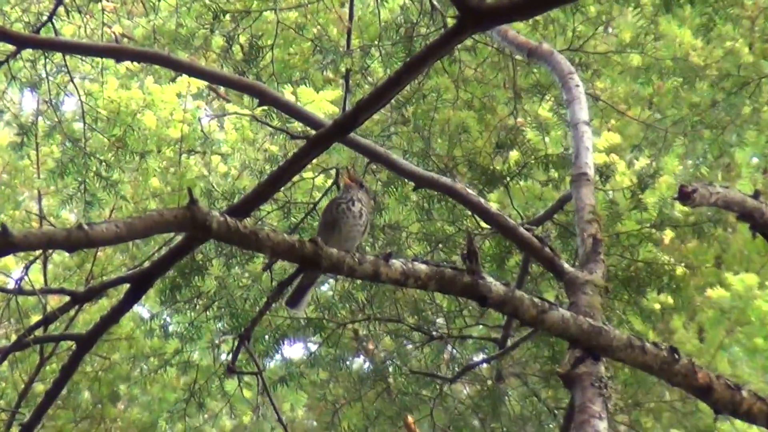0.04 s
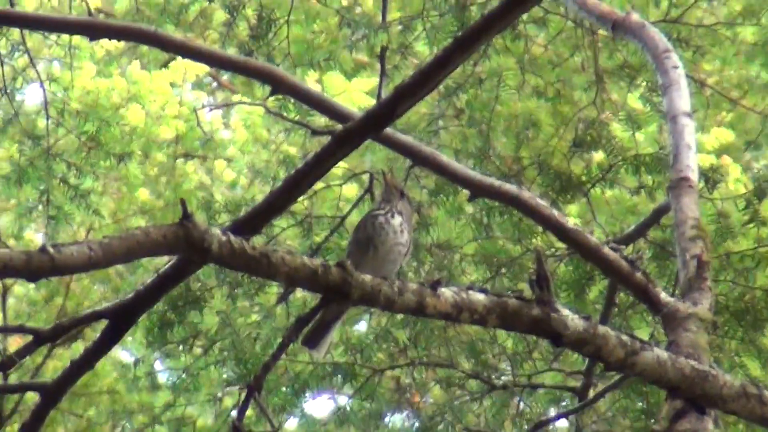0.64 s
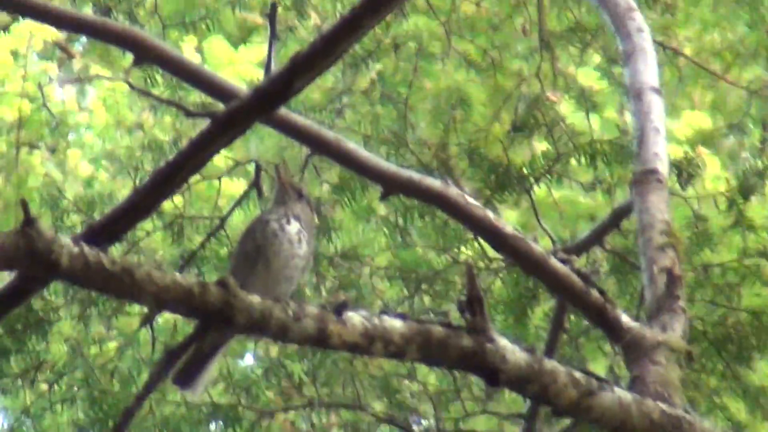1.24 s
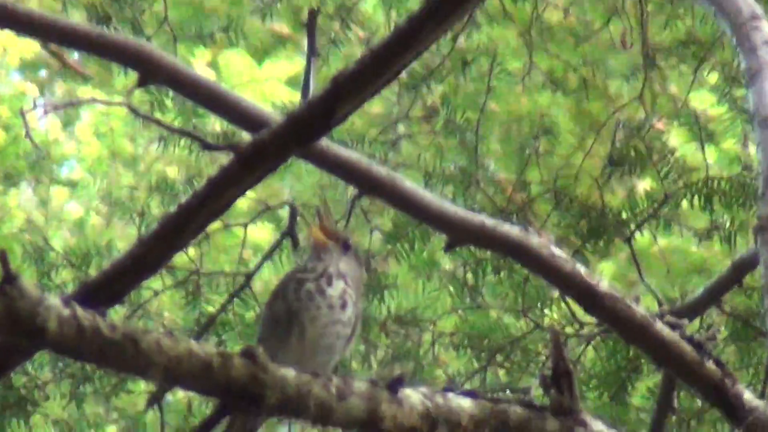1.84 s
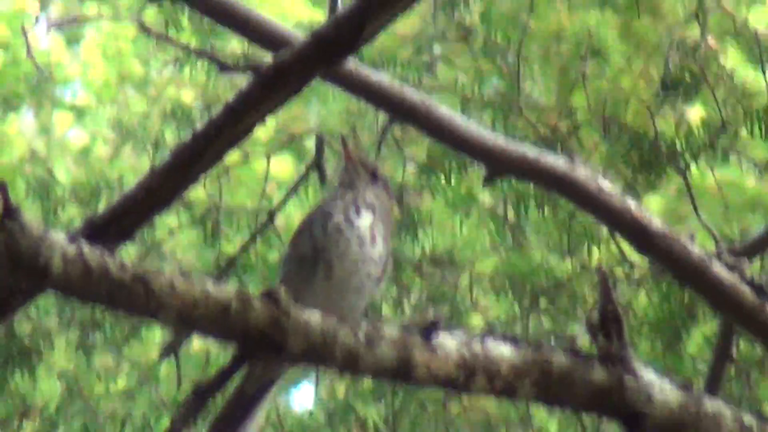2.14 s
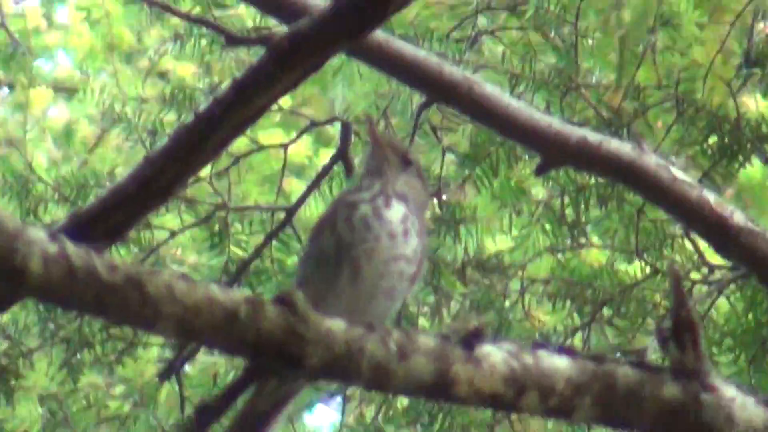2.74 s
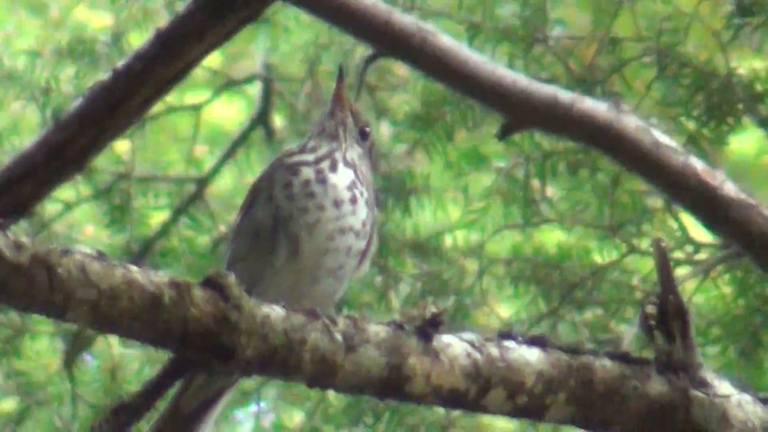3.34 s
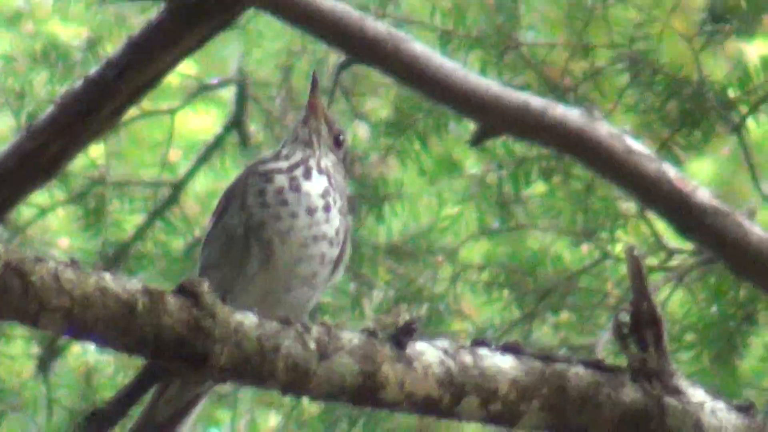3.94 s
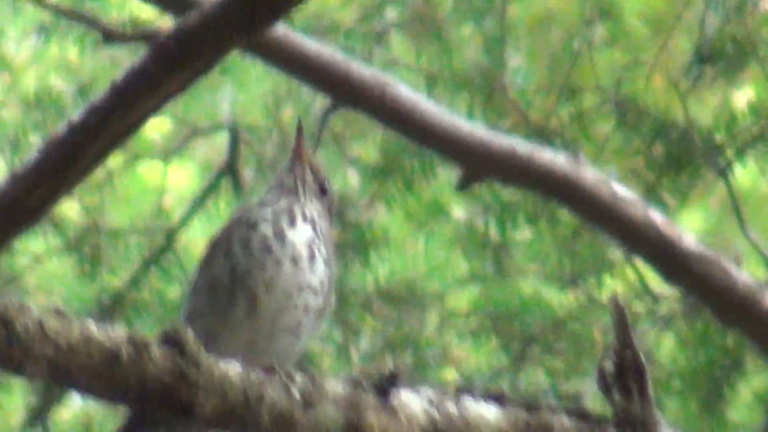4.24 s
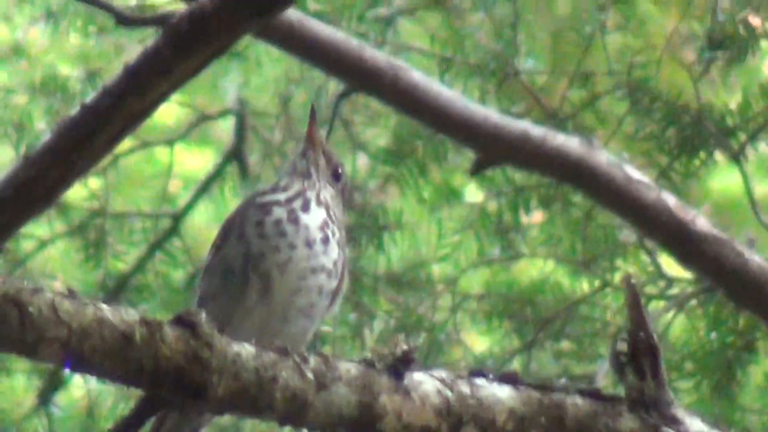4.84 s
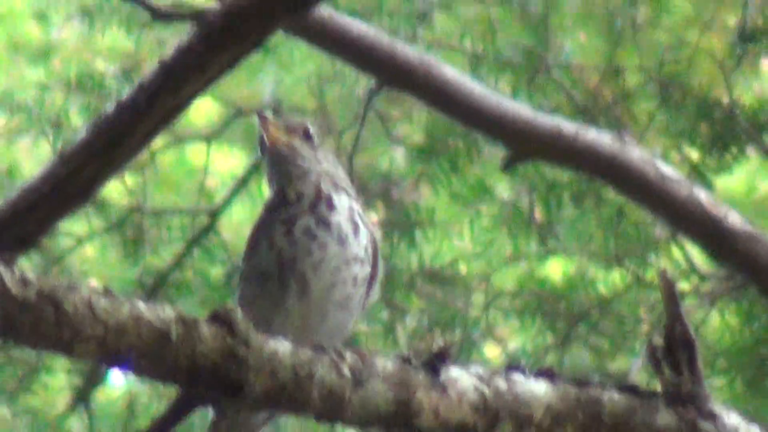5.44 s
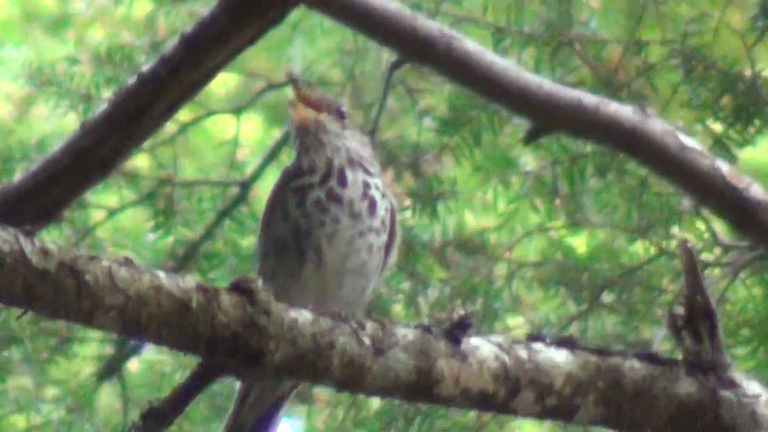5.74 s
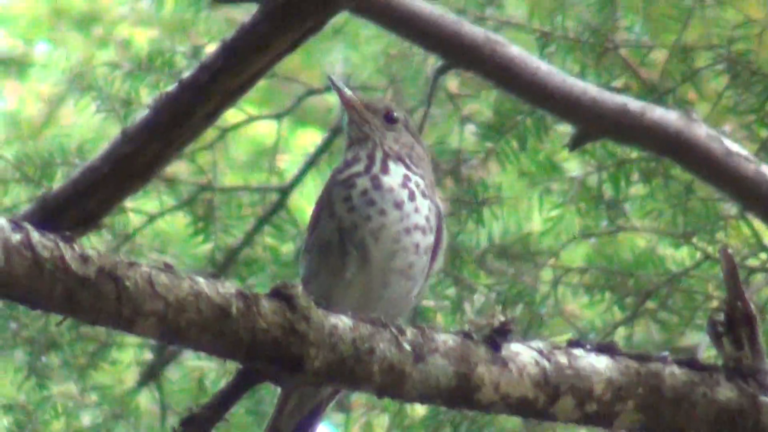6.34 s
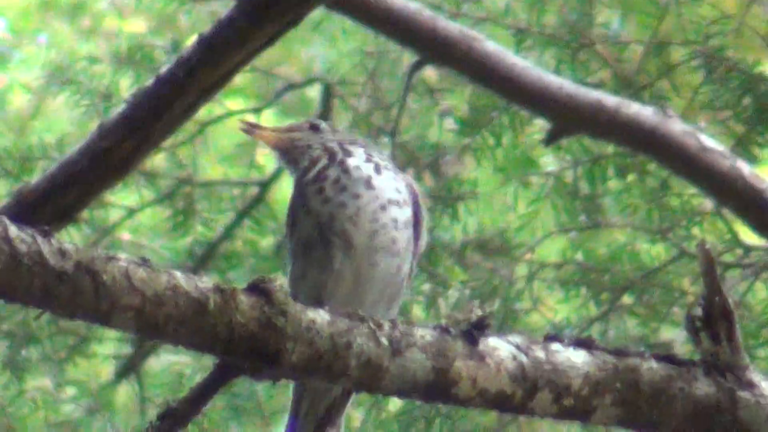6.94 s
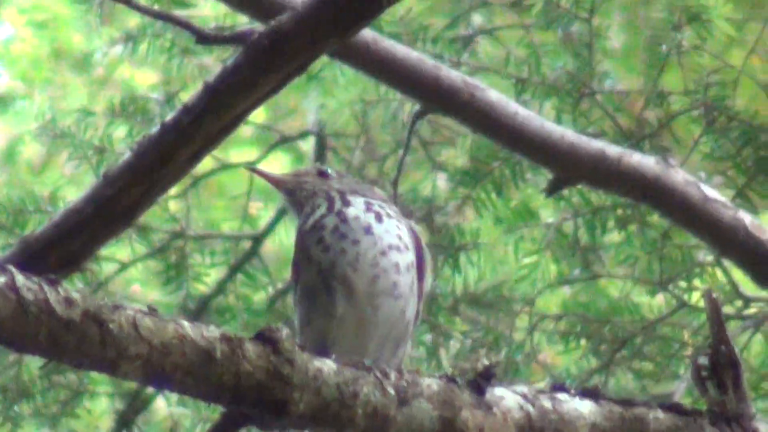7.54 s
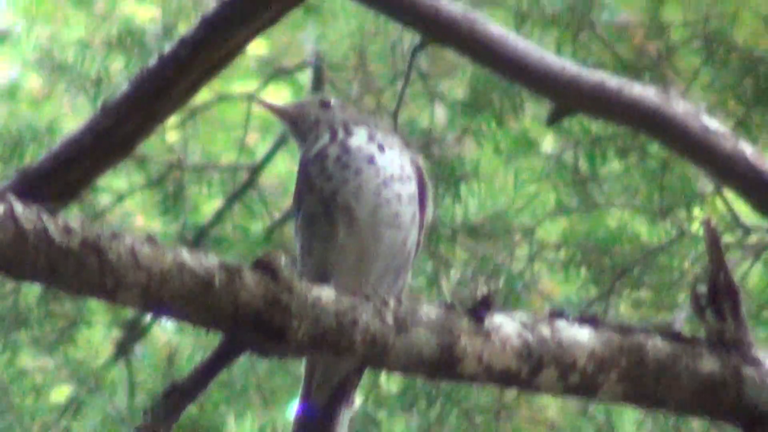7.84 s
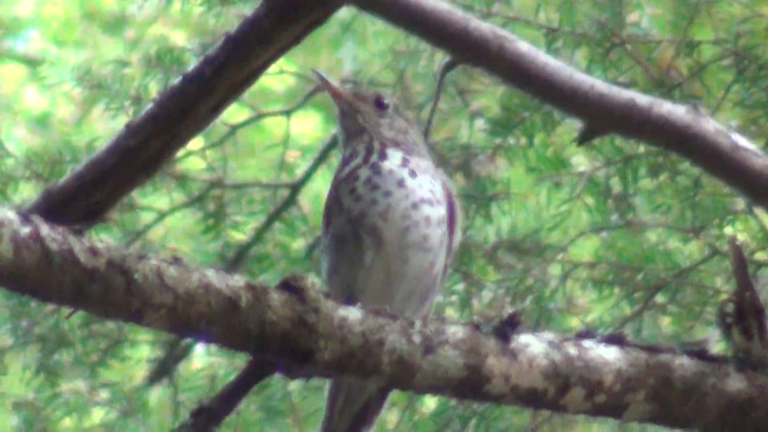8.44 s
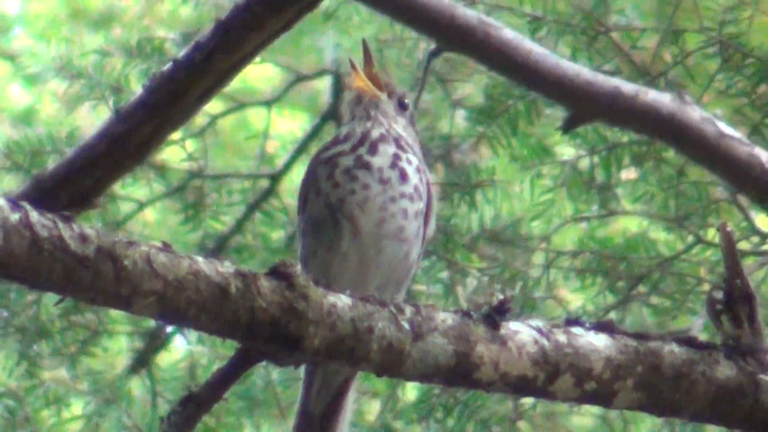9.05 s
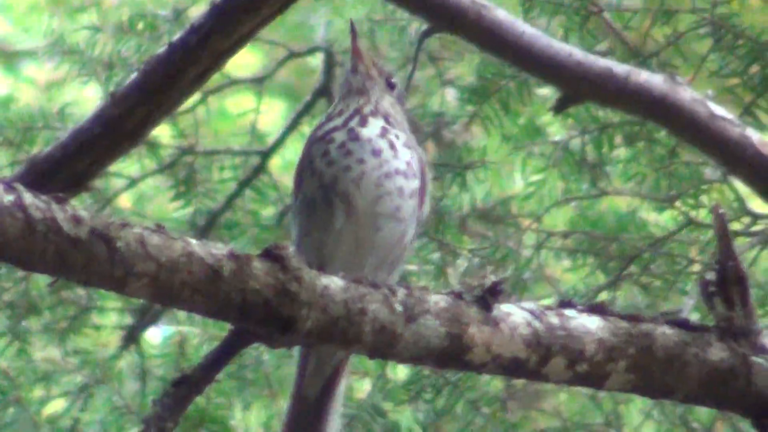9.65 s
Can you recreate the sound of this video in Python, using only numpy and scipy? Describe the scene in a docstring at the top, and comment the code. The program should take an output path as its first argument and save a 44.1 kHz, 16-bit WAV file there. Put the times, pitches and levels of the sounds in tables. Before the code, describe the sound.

A thrush gives five rising, whining calls in a quiet forest, with faint far birds, soft rustles and a distant engine rumble.

```python
"""A thrush gives five rising, whining calls in a quiet forest, over a distant engine's rumble.
Both sides of its syrinx sound at once and modulate each other; trunks and leaves scatter the sound.
Other birds whistle thinly far off. Soft rustles, faint hollow pips and one short chup come between.
An even hiss lies under it all."""
import sys
import numpy as np
from scipy import signal
from scipy.fft import rfft, irfft, next_fast_len
from scipy.io import wavfile
from scipy.ndimage import map_coordinates

SR = 44100
rng = np.random.default_rng(int(sys.argv[2]) if len(sys.argv) > 2 else 0)


def generate_wav(sig):
    """Save sig (samples, or channels by samples) to the path in sys.argv[1] as 16-bit PCM at SR."""
    pcm = np.round(np.clip(np.atleast_2d(sig).T, -1, 1) * 32767).astype(np.int16)
    wavfile.write(sys.argv[1], SR, pcm)


N = 427769
TIME_S = np.arange(N) / SR

# thrush calls: start t/s, top of climb t/s, accent t/s, end t/s, top f/Hz, glide/(Hz/s), scoop/Hz,
# accent/Hz, voice gap/Hz, gap widening/(Hz/s), sag/(dB/s), relative level/dB, upper-partial lift/dB
CALLS = [(-.13, .083, .174, .31, 2337, 200.5, 350, 100, 406.4, 150, 0, -39, -5),
         (1.559, 1.719, 1.803, 1.995, 2296, 399, 300.3, 51.8, 399.6, 598, 1, -42.6, -4.5),
         (5.479, 5.656, 5.774, 5.89, 2348, 490.5, 502, 86, 387.5, -1100, 0, -39.9, -4.5),
         (6.953, 7.181, 7.36, 7.44, 2405, 371, 150, 53.9, 263, -1100, 17, -42, 2),
         (8.751, 8.972, 9.004, 9.175, 2436, -700, 268, 56, 428, 1098.5, -1, -39.5, -2.3)]
# syrinx partials at m * low + n * high: (m, n) -> relative level/dB
SYRINX_PARTIALS = {(1, 0): 0, (0, 1): 3, (-1, 2): -15, (-2, 3): -19, (4, -2): -23.5, (3, -1): -15, (2, 0): 0, (1, 1): -8.5, (0, 2): 0, (-1, 3): -15.5, (4, -1): -24, (3, 0): -15.5, (2, 1): -20, (1, 2): -23, (0, 3): -14.5, (4, 0): -17, (3, 1): -20, (2, 2): -19, (1, 3): -27, (0, 4): -15.5, (-1, 5): -17.5, (5, 0): -21.5, (4, 1): -20, (0, 5): -11, (-1, 6): -19, (6, 0): -19, (5, 1): -23, (4, 2): -17}
# windpipe and beak response: f/Hz, gain/dB
THROAT_RESPONSE = [(1500, -16), (2150, -15.7), (2500, -14.5), (2700, -13.5), (2950, -15), (3400, -9.5),
                   (4000, -2.5), (4800, 1.5), (5600, -4), (6300, -10.5), (7200, -10), (8700, -16),
                   (10500, -10.5), (12500, -11), (14500, -12), (16000, -17)]
# air rushing through the syrinx: f/Hz, relative level/dB
RASP_SPECTRUM = [(1500, -24), (2500, -11.5), (3500, -12.5), (4900, -10), (5600, -7), (6400, -14.5),
                 (8700, -34), (10500, -22), (12500, -26), (14500, -12), (16000, -19)]
# far rumble and rush, colour: f/Hz, relative level/dB
RUMBLE_SPECTRUM = [(20, -33), (40, -9), (62, -8.5), (95, 1.5), (135, -2), (190, -2), (260, -3.5),
                   (380, -19.5)]
RUSH_SPECTRUM = [(170, -13), (320, 2), (450, 0), (650, -2), (880, 1), (1070, -6), (1210, -1), (1300, -7.5),
                 (1370, -5.5), (1550, -11.5), (1900, -16), (3000, -29.5)]
# far rumble and rush, course: t/s, relative level/dB
RUMBLE_ENVELOPE = [(0, -60.5), (.9, -65), (2.0, -63.5), (4.6, -62.5), (5.8, -63), (7.2, -61), (8.0, -65),
                   (9.1, -61.5), (9.7, -64.5)]
RUSH_ENVELOPE = [(0, -63.5), (2.0, -63), (4.6, -63.5), (7.4, -61.5), (8.5, -64.5), (9.3, -60.5)]
# low engine orders: multiple, relative level/dB
ORDERS = [(3, -77.5), (4, -71), (5, -75.5), (6, -75.5), (7, -72.5), (8, -75.5), (9, -72)]
# swells of the engine's drone: t/s, 1/e half-width/s, relative level/dB
SWELLS = [(3.0, 0.48, -66), (6.305, 0.24, -64), (7.197, 0.49, -67.5)]
# hiss, common to both ears and differing between them: f/Hz, relative level/dB
HISS_MID_SPECTRUM = [(1060, -26), (1800, -5.5), (2680, -6), (2800, -6), (3550, -7), (3850, -5),
                     (3990, -8.5), (4910, -5), (5280, -7), (7860, -7.5), (15600, -9.5)]
HISS_SIDE_SPECTRUM = [(1800, 14), (3300, -31), (5500, 7), (8000, 10), (11000, -1.5)]
# far birds: start t/s, length/s, first f/Hz, last f/Hz, middle dip/Hz, relative level/dB
FAR_WHISTLES = [(.74, .33, 3800, 3715, -1.5, -81.5), (1.21, 0.13, 2880, 2910, 0, -81),
                (3.10, .62, 4200, 3970, 229.5, -77), (3.85, .32, 4140, 4050, 0.5, -76),
                (3.66, 0.25, 3370, 3370, 40.5, -77.5), (3.85, .65, 2790, 2800, 0.5, -84),
                (4.22, 0.16, 3400, 3385, 1, -79), (4.28, .21, 3150, 3130, 0, -79),
                (9.55, .26, 3270, 3310, 0, -79), (9.52, 0.31, 4300, 4420, 0, -78)]
# soft rustles: t/s, relative level/dB
RUSTLE_PEAKS = [(2.955, -57), (3.031, -54), (3.244, -49.5), (4.753, -56), (4.822, -53), (4.97, -53),
                (9.255, -57), (9.575, -51), (9.619, -53)]
# rustle colour: f/Hz, relative level/dB
RUSTLE_SPECTRUM = [(500, 2), (900, 12), (1400, 8), (2000, -34), (3000, -22)]
# long whistle from another tree: t/s, f/Hz, relative level/dB
LONG_WHISTLE_PATH = [(3.50, 4030, -82), (3.78, 4250, -79), (3.93, 4300, -69.5), (4.19, 4243, -64.5),
                     (4.35, 4263, -66.5), (4.74, 4305, -60), (4.95, 4285, -68), (5.19, 4290, -71),
                     (5.28, 4210, -86)]
# far hollow pips: t/s, f/Hz, relative level/dB
FAR_PIPS = [(3.54, 1193, -69), (5.81, 1208, -64.5), (6.78, 1254, -72), (7.06, 914, -70), (7.26, 1234, -67),
            (7.71, 925, -65.5), (7.78, 1227, -69.5), (7.95, 898, -65.5), (8.98, 922, -68),
            (9.18, 1213, -68.5), (9.62, 912, -60)]


def from_db(db):
    """Decibels to gain."""
    return 10 ** (np.asarray(db) / 20)


def unit_rms(x):
    """Scale to rms 1."""
    return x / np.sqrt(np.mean(x ** 2) + 1e-20)


def in_time(rows, t=TIME_S):
    """Table columns, linearly interpolated in time."""
    times_s, *columns = np.transpose(rows)
    return [np.interp(t, times_s, column) for column in columns]


def db_at(spectrum, hz):
    """Spectrum level, interpolated over log frequency."""
    points_hz, level_db = np.transpose(spectrum)
    return np.interp(np.log(hz), np.log(points_hz), level_db)


def phase_of(hz):
    """Running phase of a changing pitch."""
    return 2 * np.pi * np.cumsum(hz) / SR


def span(start_s, end_s, fade_s=.0011):
    """Sample indices of a note and its soft-edged gate."""
    at = np.arange(max(int(start_s * SR), 0), min(int(end_s * SR), N))
    return at, np.clip(np.minimum(at - at[0], at[-1] - at) / (fade_s * SR), 0, 1)


def drift(rate_hz, size=N):
    """Smooth random curve, spread near 1."""
    knots = rng.standard_normal(int(2 * rate_hz * size / SR) + 4)
    coarse = np.arange(0, size + 20, 20)
    curve = map_coordinates(knots, [coarse * 2 * rate_hz / SR], order=2, mode="nearest")
    return np.interp(np.arange(size), coarse, curve)


def noise(spectrum):
    """Coloured noise, rms 1, falling steeply beyond the table's ends."""
    size = next_fast_len(N)
    hz = np.maximum(np.arange(size // 2 + 1) * SR / size, 1)
    edges = np.minimum(1, np.minimum(hz / spectrum[0][0], spectrum[-1][0] / hz)) ** 4
    white = rfft(rng.standard_normal(size))
    return unit_rms(irfft(white * from_db(db_at(spectrum, hz)) * edges, size)[:N])


def stereo(mid, side, left_db):
    """Mid and side to left and right; left_db is left over right."""
    sign = np.array([[1], [-1]])
    return (mid + sign * side) * from_db(sign * left_db / 2)


def syrinx_voices(t, start_s, top_s, accent_s, end_s, top_hz, glide_hz_per_s, scoop_hz, accent_hz,
                  gap_hz, widening_hz_per_s, sag_db_per_s):
    """Two pitches and a level contour: a call scoops up, climbs, glides with one accent and droops."""
    climb_hz_per_s, droop_hz, narrowing_hz_per_s = 2397, 168, 230
    attack_db, swell_db_per_s, release_db = 14.5, 31, 8
    age_s, to_top_s, held_s = t - start_s, np.maximum(top_s - t, 0), np.maximum(t - top_s, 0)
    ending = np.exp((t - end_s) / .036)
    wander_hz = 4.1 * drift(15.94, len(t))
    bend_hz = glide_hz_per_s * held_s + accent_hz * np.exp(-abs(t - accent_s) / .031) + wander_hz
    rise_hz = top_hz - scoop_hz * np.exp(-age_s / .027) - climb_hz_per_s * to_top_s
    low_hz = rise_hz + bend_hz - droop_hz * ending
    # high voice: splits off late, bends further, wobbles, closes in at the end
    split = 1 - np.exp(-np.maximum(age_s - .047, 0) / .024)
    closing = 1 - .8 * np.exp((t - end_s) / .028)
    spacing_hz = gap_hz - widening_hz_per_s * to_top_s - narrowing_hz_per_s * held_s
    wobble_hz = 11.04 * drift(22, len(t))
    high_hz = low_hz + split * closing * (spacing_hz + .4 * bend_hz + wobble_hz)
    onset_db = -attack_db * np.exp(-age_s / .055) - swell_db_per_s * to_top_s
    return low_hz, high_hz, onset_db - sag_db_per_s * held_s - release_db * ending


def thrush(high_voice_db=-2.5, waver=.0018, jitter=.0028, unsteady_db=1.04, shimmer_db=.62,
           rasp_db=-22.5):
    """Two coupled voices: each partial takes phase and strength from both, then passes the throat."""
    out, effort = np.zeros(N), np.zeros(N)
    for start_s, top_s, accent_s, end_s, *contour, call_db, lift_db in CALLS:
        at, gate = span(start_s, end_s)
        size = len(at)
        low_hz, high_hz, shape_db = syrinx_voices(TIME_S[at], start_s, top_s, accent_s, end_s, *contour)
        rough = 1 + 2.9 * np.exp((start_s - TIME_S[at]) / .04)   # until the voices settle
        low_phase, high_phase = [
            phase_of(hz * (1 + rough * (waver * drift(44.6, size) + jitter * drift(600, size))))
            for hz in (low_hz, high_hz)]
        low_db, high_db = [
            voice_db + shape_db + unsteady_db * drift(15.1, size) + shimmer_db * drift(150, size)
            for voice_db in (call_db, call_db + high_voice_db)]
        upper_db = lift_db + .28 * (low_db + 42)   # upper partials grow faster than the voice
        for (m, n), level_db in SYRINX_PARTIALS.items():
            high_share = abs(n) / (abs(m) + abs(n))
            voices_db = (1 - high_share) * low_db + high_share * high_db
            throat_db = db_at(THROAT_RESPONSE, m * low_hz + n * high_hz)
            strength = from_db(level_db + voices_db + upper_db * (m + n > 3) + throat_db)
            phase = m * low_phase + n * high_phase + rng.uniform(0, 2 * np.pi)
            out[at] += np.sqrt(2) * gate * strength * np.sin(phase)
        octave_gain = from_db(db_at(THROAT_RESPONSE, 2 * low_hz))
        effort[at] = gate * np.hypot(from_db(low_db), from_db(high_db)) * octave_gain
    return out + from_db(rasp_db) * effort * noise(RASP_SPECTRUM)


def forest(x, near_db, near_t60_s, far_db, far_t60_s, side_db, sway_s=.00005, side_band_hz=(4800, 5500)):
    """Near branches return separate echoes; far trunks and leaves add a dense tail."""
    t, samples = TIME_S[:SR], np.arange(N)

    def echoes():
        sparse = rng.standard_normal(SR) * (rng.random(SR) < 900 / SR)
        branches = sparse * from_db(-60 * t / near_t60_s) * (t > .002)
        leaves = rng.standard_normal(SR) * from_db(-60 * t / far_t60_s) * (1 - np.exp(-t / .024))
        response = from_db(near_db) * unit_rms(branches) + from_db(far_db) * unit_rms(leaves)
        return signal.oaconvolve(x, response)[:N] / np.sqrt(SR)

    swayed = np.interp(samples + sway_s * SR * drift(25), samples, echoes())   # foliage shifts the paths
    sideways = signal.sosfilt(signal.butter(1, side_band_hz, "band", fs=SR, output="sos"), echoes())
    return stereo(x + swayed, from_db(side_db) * sideways, left_db=1)


def far_air(heave_db=.96, flutter_db=1):
    """Far rumble and rush: mid and side noise under shared envelopes."""
    rumble = from_db(in_time(RUMBLE_ENVELOPE)[0] + heave_db * drift(3))
    rush = from_db(in_time(RUSH_ENVELOPE)[0] + flutter_db * drift(10))
    return [rumble * noise(RUMBLE_SPECTRUM) + rush * noise(RUSH_SPECTRUM) for _ in range(2)]


def engine(turn_hz=23.09, drone_hz=279.8, fading_db=2):
    """Distant engine: low orders fade in and out on the air; a higher drone comes and goes."""
    turn = phase_of(turn_hz * (1 + .00815 * drift(2)))
    orders = np.zeros(N)
    for multiple, level_db in ORDERS:
        strength = from_db(level_db - 1 + fading_db * drift(3))
        orders += strength * np.sin(multiple * turn + rng.uniform(0, 2 * np.pi))
    swell = from_db(-74) + sum(from_db(peak_db) * np.exp(-((TIME_S - peak_s) / width_s) ** 2)
                               for peak_s, width_s, peak_db in SWELLS)
    drone = swell * from_db(fading_db * drift(3)) * np.sin(phase_of(drone_hz + 2.45 * drift(5)))
    return np.sqrt(2) * (orders + drone)


def hiss(mid_db=-71.5, side_ratio_db=-16):
    """Even microphone hiss, slightly different in each ear."""
    mid, side = noise(HISS_MID_SPECTRUM), noise(HISS_SIDE_SPECTRUM)
    return from_db(mid_db) * stereo(mid, from_db(side_ratio_db) * side, left_db=0)


def whistle(hz, level_db, octave_db, waver, trill_hz, trill_depth):
    """One voice: an unsteady near-sine with a fast pitch trill; the throat shapes its octave."""
    trill = np.sin(phase_of(trill_hz * (1 + .099 * drift(8.2, len(hz)))))
    phase = phase_of(hz * (1 + waver * drift(120, len(hz)) + trill_depth * trill))
    octave = from_db(octave_db + db_at(THROAT_RESPONSE, 2 * hz)) * np.sin(2 * phase)
    return np.sqrt(2) * from_db(level_db) * (np.sin(phase) + octave)


def far_whistles(fade_db=3.5):
    """Far birds: each note slides along a shallow bow, loudest in its middle."""
    out = np.zeros(N)
    for start_s, length_s, first_hz, last_hz, dip_hz, peak_db in FAR_WHISTLES:
        at, gate = span(start_s, start_s + length_s)
        along = (TIME_S[at] - start_s) / length_s
        arch = np.sin(np.pi * along)
        hz = first_hz + (last_hz - first_hz) * along - dip_hz * arch
        level_db = peak_db - fade_db * (1 - arch)
        out[at] += gate * whistle(hz, level_db, octave_db=-30, waver=.0095,
                                  trill_hz=90.4, trill_depth=.0084)
    return out


def rustles(t60_s=.029, gain_db=.5):
    """Dull puffs of noise that die quickly."""
    touches = np.zeros(N)
    for start_s, peak_db in RUSTLE_PEAKS:
        touches[int(start_s * SR)] = from_db(peak_db + gain_db)
    envelope = signal.lfilter([1], [1, -from_db(-60 / (t60_s * SR))], touches + 1e-18)
    return envelope * noise(RUSTLE_SPECTRUM)


def long_whistle(gain_db=-3):
    """One held, finely trilled note."""
    out = np.zeros(N)
    at, gate = span(LONG_WHISTLE_PATH[0][0], LONG_WHISTLE_PATH[-1][0])
    hz, level_db = in_time(LONG_WHISTLE_PATH, TIME_S[at])
    out[at] = gate * whistle(hz, level_db + gain_db, octave_db=-30, waver=.0017,
                             trill_hz=176, trill_depth=.019)
    return out


def pips(sigma_s=.045, blur_hz=22):
    """Distance smears each pip into a short swell of narrow noise."""
    out = np.zeros(N)
    for peak_s, hz, peak_db in FAR_PIPS:
        at, gate = span(peak_s - .2, peak_s + .2)
        phase = 2 * np.pi * hz * TIME_S[at]
        blurred = drift(blur_hz, len(at)) * np.cos(phase) + drift(blur_hz, len(at)) * np.sin(phase)
        swell = np.exp(-.5 * ((TIME_S[at] - peak_s) / sigma_s) ** 2)
        out[at] += gate * from_db(peak_db) * swell * blurred
    return out


def chup(start_s=4.575, length_s=.033, rest_hz=2350, fall_hz=1500, fall_s=.009,
         warble_hz=101.4, depth_hz=470, warble_db=2, fade_db=6.5):
    """A falling note with a few wide, fast warbles, louder on each upswing."""
    out = np.zeros(N)
    at, gate = span(start_s, start_s + length_s)
    age_s = TIME_S[at] - start_s
    warble = np.cos(2 * np.pi * warble_hz * age_s)
    hz = rest_hz + fall_hz * np.exp(-age_s / fall_s) + depth_hz * warble
    level_db = -50.5 + warble_db * warble - fade_db * (age_s / length_s) ** 2
    out[at] = gate * whistle(hz, level_db, octave_db=-6.5, waver=.019, trill_hz=298, trill_depth=.01)
    return out


def scene():
    """Close, fairly dry thrush; trees blur farther birds more. Birds lean left, the background right."""
    close = forest(thrush(), near_db=-7, near_t60_s=.16, far_db=-16.5, far_t60_s=.66, side_db=-18)
    neighbours = forest(chup() + long_whistle(),
                        near_db=-5.5, near_t60_s=.21, far_db=-13, far_t60_s=.51, side_db=-10.5)
    distant = forest(far_whistles(), near_db=-3, near_t60_s=.2, far_db=-2, far_t60_s=.7, side_db=-14)
    air_mid, air_side = far_air()
    background = stereo(air_mid + engine() + pips() + rustles(), from_db(-16) * air_side, left_db=-3.8)
    return from_db(-1) * close + neighbours + from_db(-2) * distant + background + hiss()


def record(dry, cutoff_hz=15750):
    """Steep low-pass."""
    return signal.sosfilt(signal.ellip(12, .1, 70, cutoff_hz, fs=SR, output="sos"), dry)


dry = scene()
out = record(dry)
generate_wav(out)
```